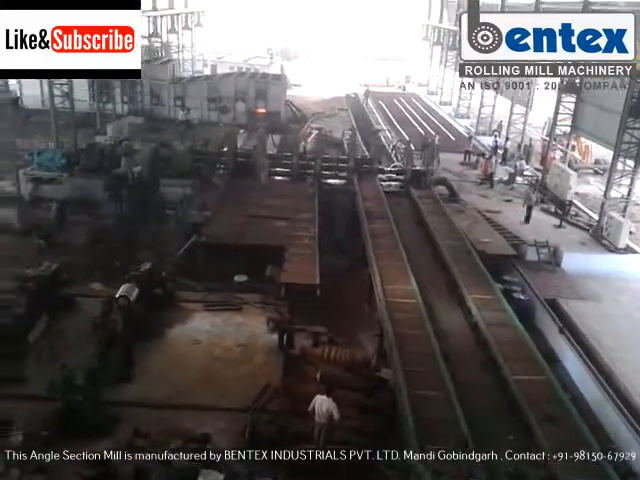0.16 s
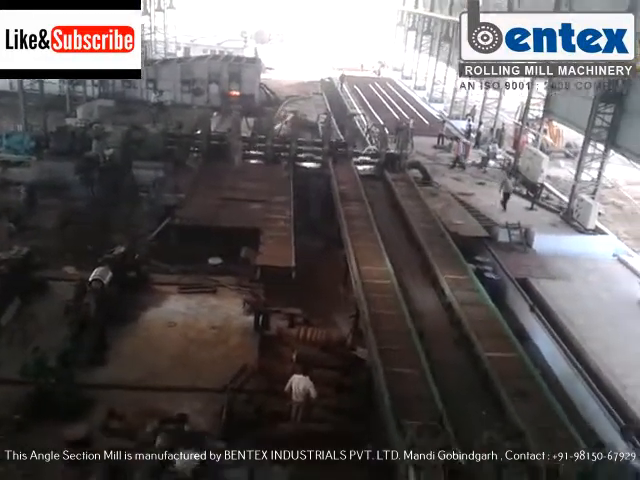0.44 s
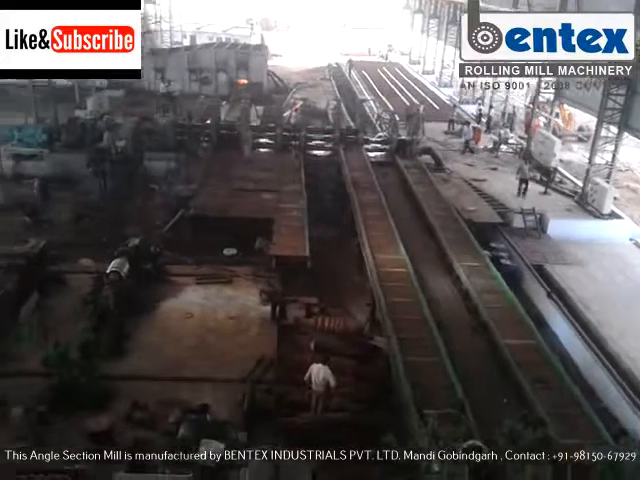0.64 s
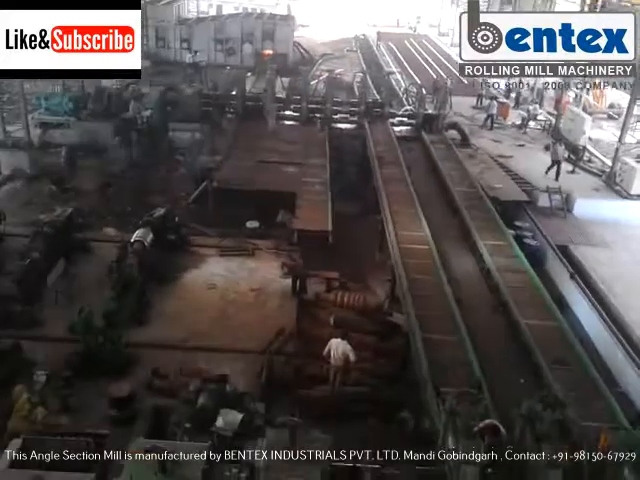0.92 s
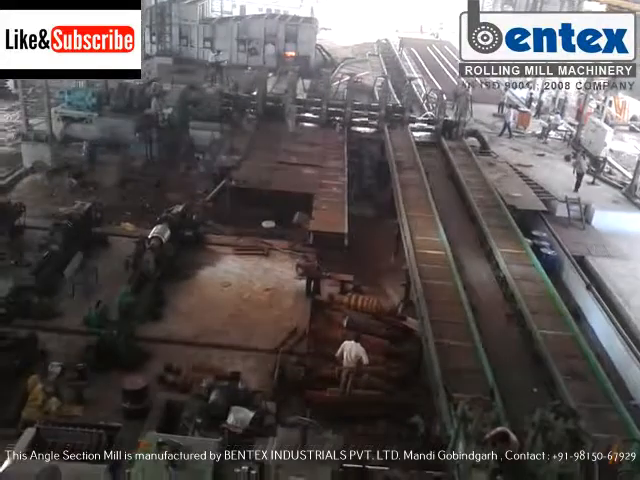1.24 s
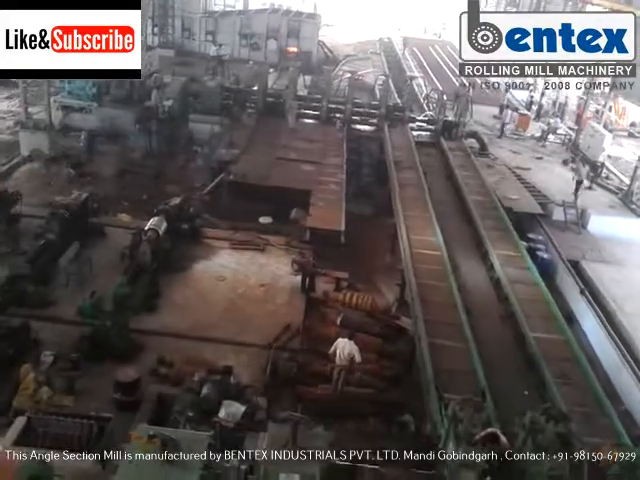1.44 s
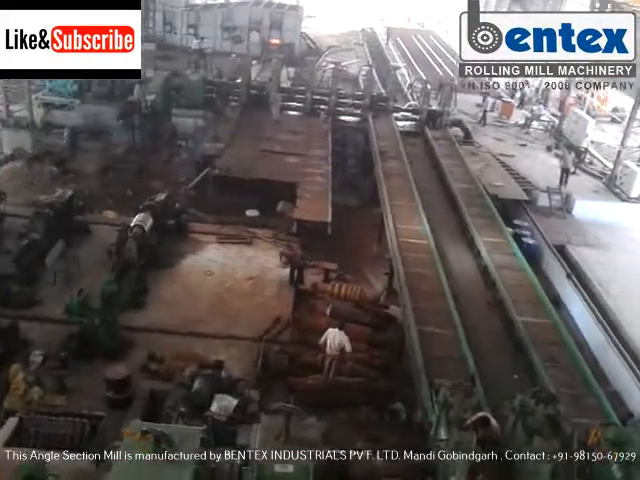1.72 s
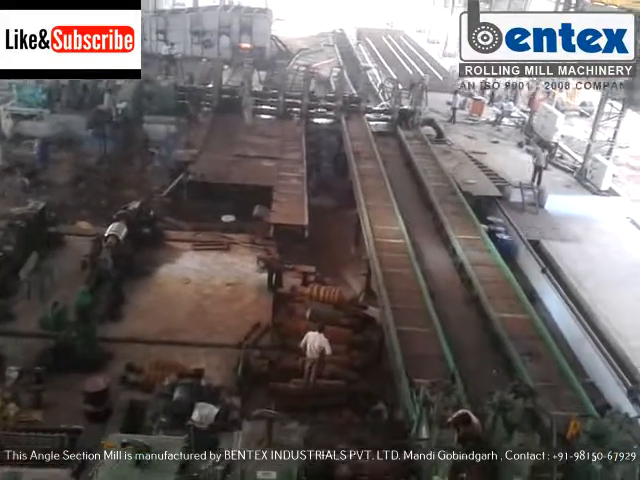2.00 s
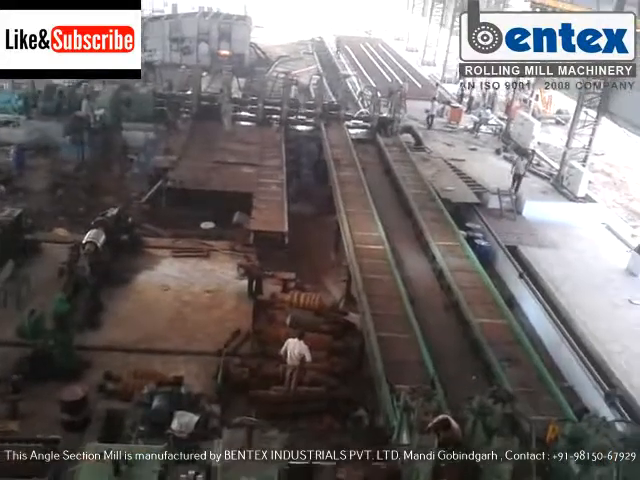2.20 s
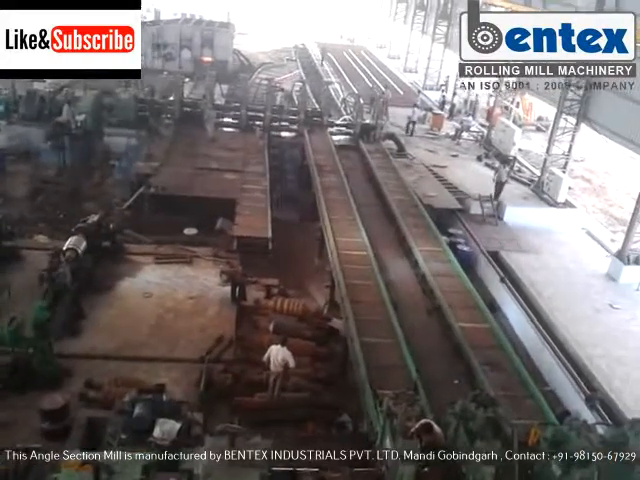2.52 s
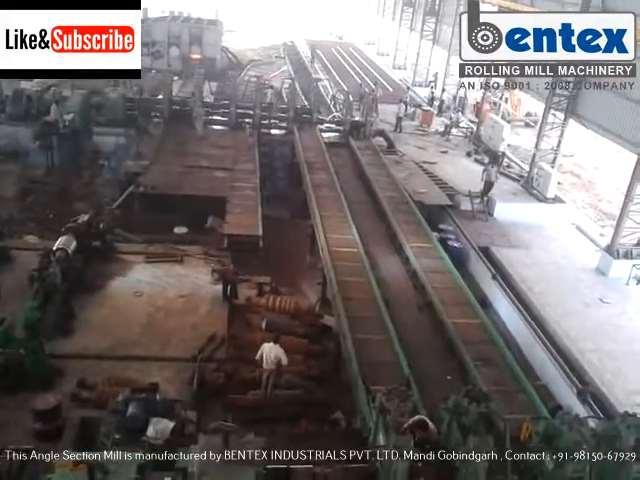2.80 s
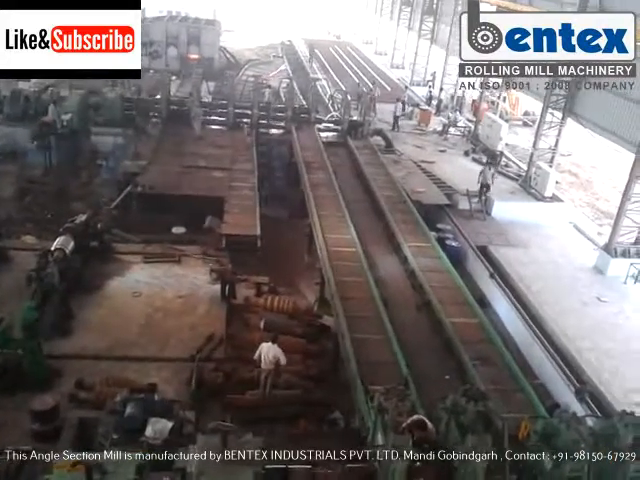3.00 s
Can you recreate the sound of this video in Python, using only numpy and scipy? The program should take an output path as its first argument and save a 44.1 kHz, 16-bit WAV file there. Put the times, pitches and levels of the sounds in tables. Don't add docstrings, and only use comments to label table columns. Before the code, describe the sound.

A steel rolling mill roars throughout, a dense mid-range roller rumble with motor hum in a large hall. Gear whine swells near 0.2, 0.7, 1.2, 1.75, 2.25 and 2.8 seconds, changing tone each time. Blurred steel clanks come irregularly, strongest around 0.7, clustered near 1.2 and thinner later. A low thump lands at 1.7. The limited, bass-poor microphone crackles and clicks on peaks.

```python
import sys
import numpy as np
from scipy import signal
from scipy.fft import rfft, irfft
from scipy.io import wavfile
from scipy.ndimage import uniform_filter1d

SR = 44100
rng = np.random.default_rng(int(sys.argv[2]) if len(sys.argv) > 2 else 0)


def bounce(signal):
    frames = np.transpose(np.atleast_2d(signal))
    limited = np.clip(frames, -1, 1)
    pcm = np.round(limited * 32767).astype(np.int16)
    wavfile.write(sys.argv[1], SR, pcm)


def level_to_linear(level):
    exponent = np.asarray(level, float) / 20
    return 10 ** exponent


N = 138915
BIN_HZ = np.fft.rfftfreq(N, 1 / SR)
OCTAVES_BELOW_8K = np.log2(8000 / (BIN_HZ + 100))


def evened(x):
    return x / np.sqrt(np.mean(x ** 2) + 1e-20)


def wander(count, size):
    return evened(uniform_filter1d(rng.standard_normal(count), size=size))


def read(points, hz):
    table_hz, value = np.transpose(points)
    return np.interp(np.log(hz + 1), np.log(table_hz + 1), value)


def coloured(x, gain_db):
    return irfft(rfft(x) * level_to_linear(gain_db), N)


def resonate(x, hz, width):
    steadiness = .3
    carrier = np.exp(2j * np.pi * np.cumsum(hz * np.ones(N)) / SR)
    decay = np.exp(-np.pi * width / SR)
    envelope = signal.lfilter([1], [1, -2 * decay, decay * decay], x / carrier)
    envelope = envelope / (abs(envelope) + 1e-9) ** steadiness
    return evened((carrier * envelope).real)


def swell(start, rise, t60):
    t = np.maximum(np.arange(N) / SR - start + rise, 0)
    return (1 - np.exp(-(t / rise) ** 2)) * level_to_linear(-60 * t / t60)


def ticks(table, gain_db):
    out = np.zeros(N)
    for start, db in table:
        place = min(round((start + .0004) * SR), N - 1)
        out[place] += rng.choice([-1, 1]) * level_to_linear(db + gain_db)
    return out


# (time [s], level [dB])
ROLLER_LOAD = [(0, -16.5), (.2, -17.5), (.44, -17), (.5, -21), (.6, -18), (.72, -16), (1.02, -18.5),
               (1.28, -17.5), (1.43, -20), (1.52, -17), (2.15, -17.5), (2.26, -19), (2.5, -19.5),
               (2.56, -17.5), (2.93, -16.5), (3.02, -20), (3.07, -17.5), (3.15, -17.5)]
# (frequency [Hz], density [dB per Hz])
ROLLER_SPECTRUM = [(76, -71.5), (130, -76), (285, -10), (634, 1.5), (1260, -11.5), (1840, -11.5),
                   (2450, -16.5), (5920, -16.5), (7000, -18), (9100, -61.5), (15400, -120)]


def rumble():
    low_share, high_share, turnover_hz = 1, .25, 2000
    patch_db, flicker_db = 1, 0.1
    window, hop = 512, 128
    frames, hz = N // hop + 5, np.fft.rfftfreq(window, 1 / SR)
    real, imag, patches = rng.standard_normal((frames, len(hz), 3)).T
    patches = uniform_filter1d(patches, size=5, axis=0)
    patches = evened(uniform_filter1d(patches, size=24, axis=1))

    t, load_db = np.transpose(ROLLER_LOAD)
    swing_db = np.interp(np.arange(frames) * hop / SR, t, load_db - load_db.mean())
    swing_db = swing_db + flicker_db * wander(frames, 8)
    share = high_share + (low_share - high_share) / (1 + (hz / turnover_hz) ** 2)
    field_db = read(ROLLER_SPECTRUM, np.minimum(hz, 6900))[:, None]
    field_db = field_db + share[:, None] * swing_db + patch_db * patches
    spectrum = (real + 1j * imag) * level_to_linear(field_db)
    noise = signal.istft(spectrum, nperseg=window, noverlap=window - hop)[1][:N]
    return level_to_linear(load_db.mean() + 1.5) * evened(noise)


# (multiple of the mesh rate [1], level [dB])
TOOTH_HARMONICS = [(3.03, -1.5), (3.97, -3), (6.06, -5), (7, -16), (8, -11), (9, -7.5), (10, -19.5)]
# (frequency [Hz], width [Hz], level [dB])
CASING_MODES = [(997, 240, 0.5), (1480, 1430, -0.5), (1747, 56, -5), (1829, 34, -4.5), (2218, 37, -13)]
# (time [s], fourth harmonic [dB], third [dB], upper harmonics [dB], casing [dB])
SHAFT_TURNS = [
    (.18, -21, -36, -20, -26),
    (0.698, -26, -32, -30, -18.5),
    (1.23, -30.5, -24, -24, -20),
    (1.758, -43.5, -25, -19, -25),
    (2.245, -18, -25.5, -30, -22),
    (2.8, -29, -51, -23.5, -40),
]


def gears():
    mesh_hz, mesh_width_hz, speed_wander = 474, 23, .007
    rise_s, t60_s, rest_db = .03, .6, -34
    upper_t60_s, upper_rest_db = 0.42, -35.5
    mesh = mesh_hz * (1 + speed_wander * wander(N, 6000))
    fourth, third, casing = np.full((3, N), level_to_linear(rest_db))
    upper = np.full(N, level_to_linear(upper_rest_db))
    for start, fourth_db, third_db, upper_db, casing_db in SHAFT_TURNS:
        grind = swell(start, rise_s, t60_s)
        fourth += level_to_linear(fourth_db) * grind
        third += level_to_linear(third_db) * grind
        casing += level_to_linear(casing_db) * grind
        upper += level_to_linear(upper_db) * swell(start, rise_s, upper_t60_s)

    out = np.zeros(N)
    levels = [third, fourth] + [upper] * len(TOOTH_HARMONICS)
    for (multiple, db), level in zip(TOOTH_HARMONICS, levels):
        width = mesh_width_hz * np.sqrt(multiple)
        out += level_to_linear(db) * level * resonate(rng.standard_normal(N), multiple * mesh, width)
    for hz, width, db in CASING_MODES:
        out += level_to_linear(db) * casing * resonate(rng.standard_normal(N), hz, width)
    return out


# (frequency [Hz], width [Hz], level [dB])
MACHINE_HUMS = [(151, 6.6, -60.5), (251.7, 29, -44), (300, 12, -40.5), (640, 15, -37), (800, 60, -29.5),
                (2255, 46, -37)]


def drones():
    waver_db = 1.5
    out = np.zeros(N)
    for hz, width, db in MACHINE_HUMS:
        level = level_to_linear(db + waver_db * wander(N, 8000))
        out += level * resonate(rng.standard_normal(N), hz, width)
    return out


# (frequency [Hz], gain [dB])
LOW_LIMIT = [(20, -36), (70, -30), (105, -23), (150, -6), (220, 1)]
# (frequency [Hz], gain [dB])
HIGH_LIMIT = [(6950, 1.5), (7300, -14.5), (7800, -34), (8150, -56.5), (8500, -33.5), (9150, -46),
              (9400, -100)]


def limited(x):
    ceiling, knee = .68, 8
    held = x / (1 + abs(x / ceiling) ** knee) ** (1 / knee)
    return coloured(held, (read(LOW_LIMIT, BIN_HZ) + read(HIGH_LIMIT, BIN_HZ)) / 2)


# (time [s], level [dB])
OVERLOAD_PEAKS = [(0.028, -50.5), (0.0423, -26), (0.218, -46.5), (0.607, -31), (0.7123, -38.5),
                  (0.7106, -38.5), (0.7148, -35.5), (0.7672, -38), (0.7826, -47.5), (0.85, -32.5),
                  (0.9448, -61), (1.1402, -30.5), (1.2685, -27), (1.3016, -43.5), (1.7025, -55.5),
                  (2.2343, -42), (2.2623, -48.5), (2.804, -36.5), (3.1464, -33.5)]


def overload_crackle():
    tilt_db = 2.4
    return coloured(ticks(OVERLOAD_PEAKS, 9.5), tilt_db * OCTAVES_BELOW_8K)


# (time [s], level [dB], pitch [Hz])
BAR_DROPS = [(.045, -52, 640), (0.208, -20, 800), (.6, -19.5, 464), (0.707, -15, 774), (0.771, -23, 924),
             (0.951, -18, 525), (1.151, -20, 542), (1.255, -21.5, 903), (1.3, -18, 618), (1.69, -18.5, 748),
             (2.236, -19.5, 640), (2.541, -20, 697), (2.652, -23.5, 980), (2.802, -24, 790)]


def clanks():
    width_hz, rise_s, t60_s = 143, 0.0041, 0.25
    out = np.zeros(N)
    for start, db, hz in BAR_DROPS:
        noise = rng.standard_normal(N)
        ring = resonate(noise, hz, width_hz)
        ring = ring + level_to_linear(-7.5) * resonate(noise, 2.5 * hz, 2 * width_hz)
        out += level_to_linear(db) * swell(start, rise_s, t60_s) * ring
    return out


# (time [s], level [dB])
JOIN_KNOCKS = [
    (.075, -50),
    (.115, -49),
    (1.69, -30),
    (1.775, -46.5),
    (2.63, -44),
]


def join_thumps():
    top_hz, foot_hz = 170, 71
    top_loss = 1 + (BIN_HZ / top_hz) ** 6
    foot_loss = 1 + (foot_hz / (BIN_HZ + 1)) ** 2
    return coloured(ticks(JOIN_KNOCKS, 30), -10 * np.log10(top_loss * foot_loss))


# (time [s], level [dB])
BLOCK_JOINS = [(0.078, -38), (0.158, -54.5), (0.2753, -46.5), (0.3557, -43), (0.3945, -34), (0.4768, -54.5),
               (0.636, -37), (0.7467, -25), (0.7978, -44), (0.9961, -48), (1.2774, -54.5), (1.6837, -35.5),
               (1.914, -39), (1.9966, -50.5), (2.3895, -66), (2.9183, -32)]


def join_ticks():
    tilt_db, top_hz = -2, 8700
    edge_db = -10 * np.log10(1 + (BIN_HZ / top_hz) ** 50)
    return coloured(ticks(BLOCK_JOINS, 20), tilt_db * OCTAVES_BELOW_8K + edge_db)


def scene():
    return (rumble() + gears() + drones() + clanks())[None]


def low_pass(x):
    return signal.sosfilt(signal.butter(12, 15830, fs=SR, output="sos"), x)


def record(dry):
    x = limited(limited(dry[0]))
    x = x + overload_crackle() + join_thumps() + join_ticks()
    return low_pass(x[None])


dry = scene()
out = record(dry)
bounce(out)
```